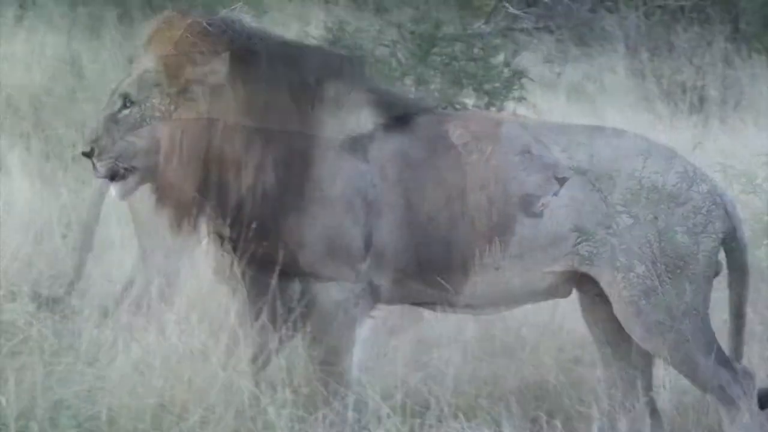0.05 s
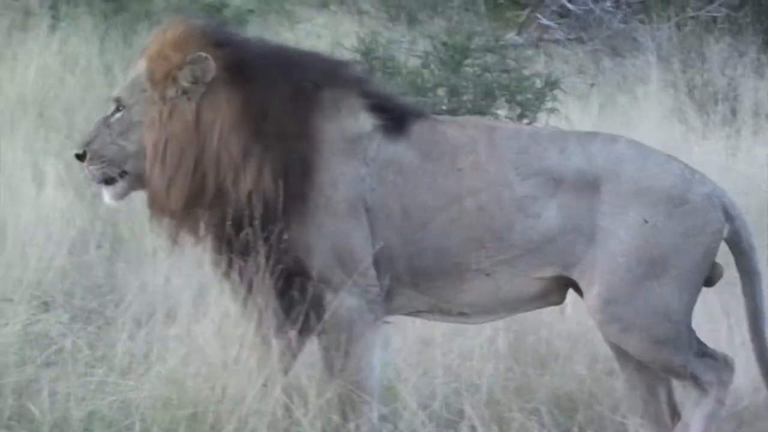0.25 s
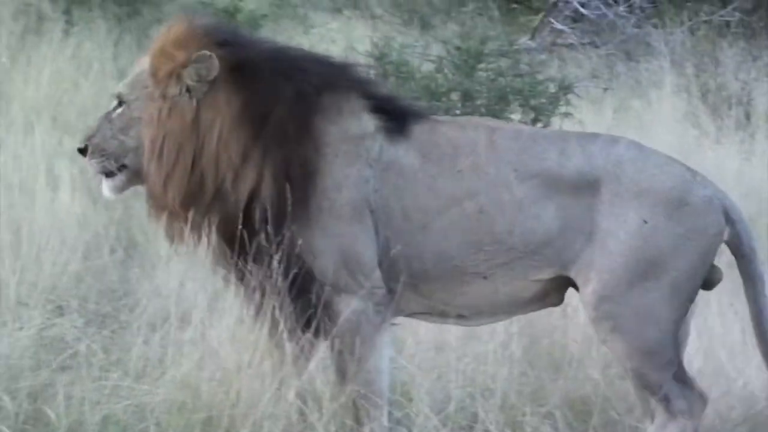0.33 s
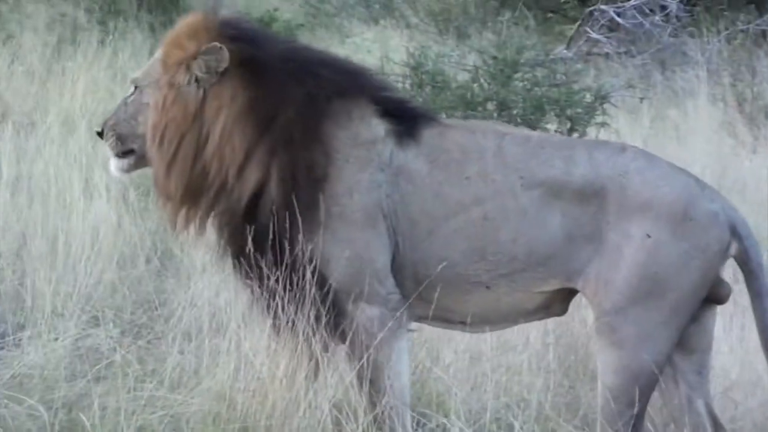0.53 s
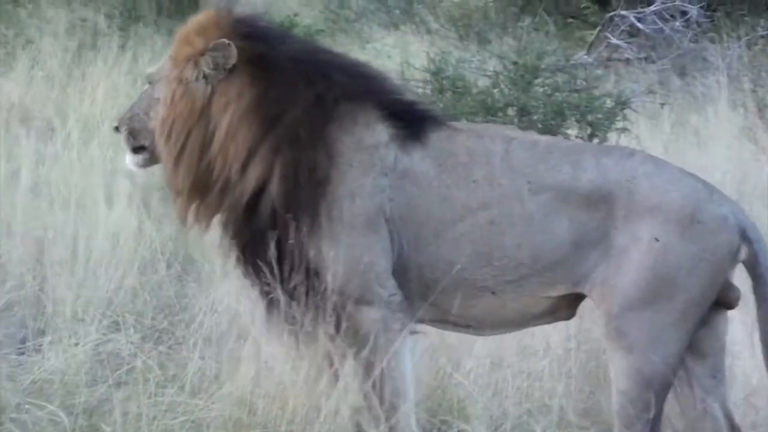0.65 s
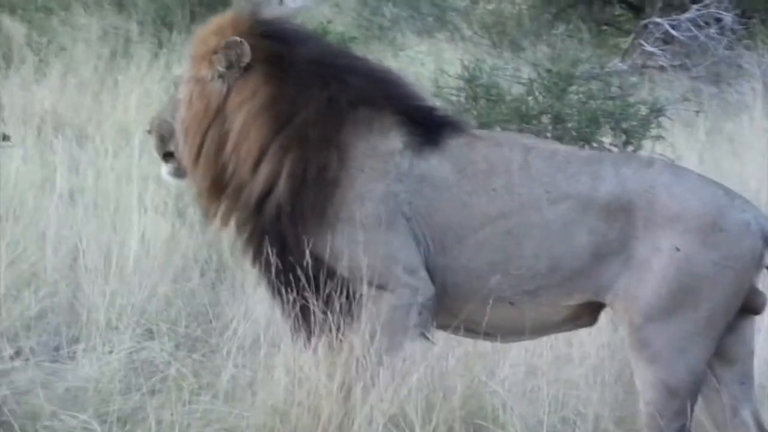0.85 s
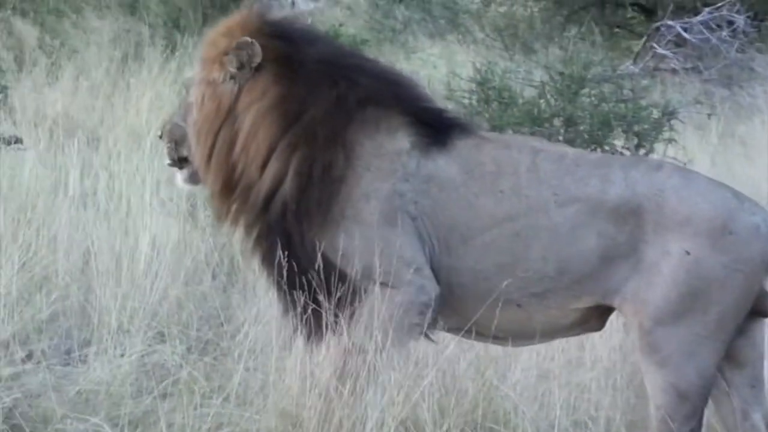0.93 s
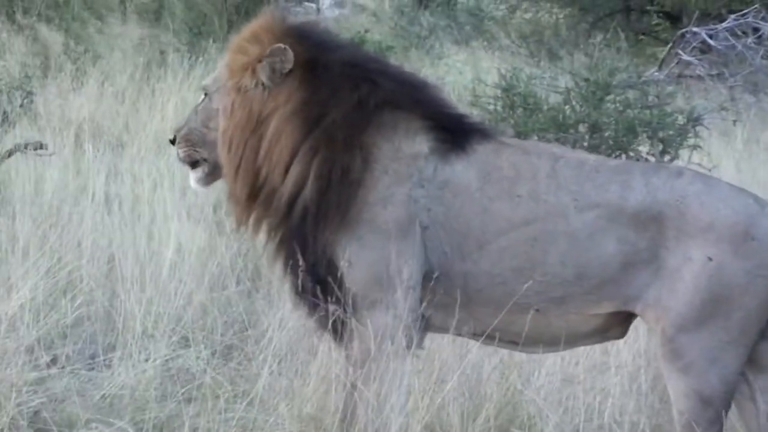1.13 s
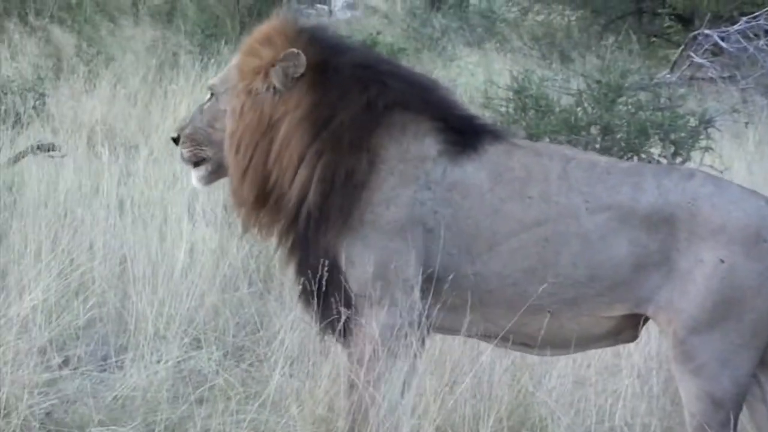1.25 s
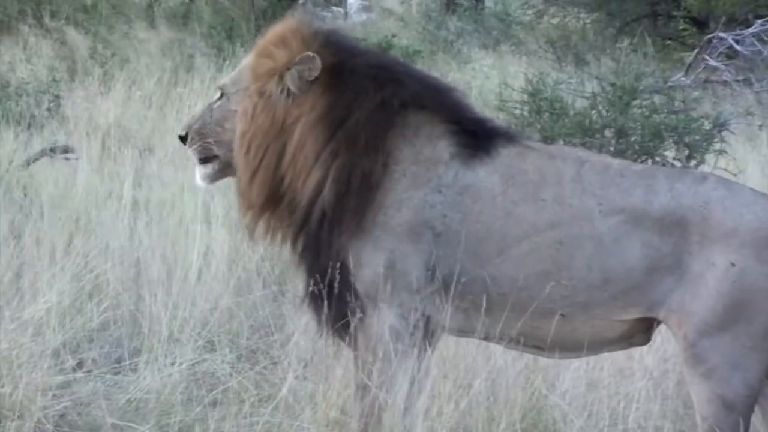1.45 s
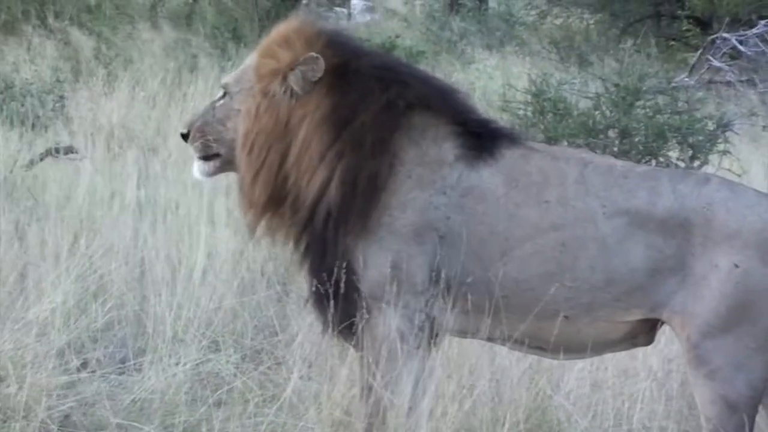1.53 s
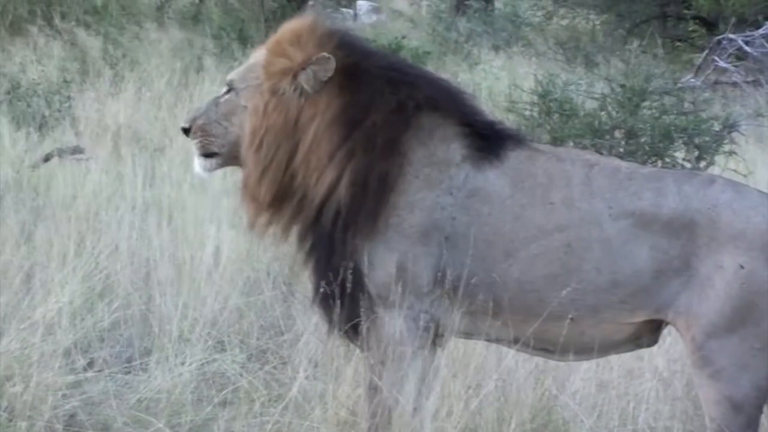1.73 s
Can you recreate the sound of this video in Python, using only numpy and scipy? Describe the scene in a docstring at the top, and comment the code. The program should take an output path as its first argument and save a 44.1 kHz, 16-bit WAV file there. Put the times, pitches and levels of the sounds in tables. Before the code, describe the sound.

A bird sings one clear phrase in open grassland, almost straight ahead. At about 0.2 seconds a high whistle drops and wavers, followed near 0.6 by a softer, lower warble. From 0.8 to 1.5 seconds come five quick rising chirps with a thin echo. A barely audible dull scuff falls under the first chirp. Faint wind rumble and even hiss continue throughout.

```python
"""A high bird whistle drops and wavers, then come a soft low warble and five upslurred chirps, each led
in by a short grace note. One bird sings in open grassland, almost straight ahead of a stereo pair of
microphones. The direct sound arrives first, then a bounce off the ground and a thin echo from bushes
farther off. Underneath lie faint wind rumble, an even hiss and one soft scuff."""
import sys
import numpy as np
from scipy import signal
from scipy.fft import rfft, irfft
from scipy.io import wavfile
from scipy.ndimage import uniform_filter1d

SR = 44100
rng = np.random.default_rng(int(sys.argv[2]) if len(sys.argv) > 2 else 0)


def to_wav(sig):
    """Store sig (one row per channel, or 1-D mono) as 16-bit WAV at the path in sys.argv[1].

    Samples outside -1..1 are clipped; the rate is SR.
    """
    pcm = np.clip(np.atleast_2d(sig), -1, 1) * 32767
    pcm = np.round(pcm).astype(np.int16)
    wavfile.write(sys.argv[1], SR, pcm.T)  # frames by channels


N = 79380

# melody of the opening whistle: t/s, f/Hz
WHISTLE_PITCH = [(0.229, 4940), (0.263, 5174), (0.274, 5053), (0.283, 5260), (0.294, 3580), (0.297, 3453),
                 (.302, 3816), (.308, 3220), (0.334, 3100), (0.349, 3546), (0.356, 2897), (0.363, 3047),
                 (.369, 3340), (0.376, 2937), (0.387, 3168), (0.392, 3396), (0.398, 3220), (0.407, 3450),
                 (.418, 3435), (.455, 3825), (.472, 3727)]
# strength of the opening whistle: t/s, level/dB
WHISTLE_LEVEL = [(0.229, -52), (.238, -37), (0.249, -31.5), (.282, -33.5), (0.297, -33.5), (0.301, -29),
                 (.315, -33), (0.351, -30.5), (0.359, -49), (.37, -27), (0.377, -40), (0.387, -30),
                 (.43, -30), (0.468, -29.5), (0.471, -46)]
# low warble: t/s, f/Hz, level/dB
WARBLE = [(0.578, 2060, -55.5), (0.594, 2327, -42.5), (0.612, 2320, -39), (0.632, 2038, -40.5),
          (0.656, 2294, -40.5), (0.676, 2538, -31), (0.684, 2512, -30), (0.69, 2527, -37.5),
          (0.694, 2234, -41.5), (0.702, 2040, -58.5)]
# chirps: start/s, length/s, level/dB, top f/Hz, time to top/s, end f/Hz, overtone boost/dB,
# then each one's grace note: length/s, f/Hz, rise/s, level/dB
CHIRPS = [ (.821, 0.071, -31, 3606, 0.036, 3200, 1.5, 0.016, 3250, 0.0108, -38.5),
          (0.949, 0.071, -30, 3741, 0.055, 3500, 1.5, 0.018, 3310, 0.01, -42),
          (1.088, 0.074, -29, 3854, 0.048, 3210, 2, 0.019, 3800, .014, -39.5),
          (1.238, 0.069, -30.5, 3737, 0.0452, 3560, 0.5, .020, 3164, 0.0109, -39),
          (1.408, 0.064, -32.5, 3720, 0.045, 3880, 0.5, .019, 2943, .010, -45), ]
# colour that throat and beak give the overtones: f/Hz, gain/dB
THROAT = [(4200, -14.5), (5100, -18), (6400, -28), (7100, -41), (7700, -36.5), (8600, -21.5), (9700, -27),
          (11300, -18), (12800, -13), (14200, -32), (15500, -19)]
# hollow resonances of the scuff: f/Hz, width/Hz, relative level/dB
SCUFF_MODES = [(337, 52, 1), (478, 110, -5), (650, 60, -0.5), (864, 62, 3), (1170, 310, -10)]
# spectrum of still air and wind: f/Hz, relative level/dB
AIR_SPECTRUM = [(15, 11.5), (25, 8.5), (45, 4.5), (80, -11), (140, -17.5), (300, -24), (600, -29.5),
                (1200, -33.5), (3000, -35.5), (5000, -39.5), (9000, -41), (15500, -43)]
# how alike the air is at the two microphones: f/Hz, correlation
AIR_LIKENESS = [(25, -.86), (70, -.78), (160, -.4), (350, -.05), (1200, .3), (4000, .3), (15000, .15)]
# slow drift of hiss and rumble: t/s, gain/dB
AIR_DRIFT = [(0, 2), (0.249, -0.5), (.55, -1), (1.5, 0), (1.8, 2)]

OVERTONE_DB = (-1.5, -8.5, -9.5, -25.5)  # harmonics 2 to 5; throat and brightness add to these
WHISTLE_BRIGHT_DB, WARBLE_BRIGHT_DB = (3.5, 1.5, 4.5, 2), (-4.5, 1.5, -3, 4.5)
CHIRP_BRIGHT_DB, GRACE_BRIGHT_DB = (-4.5, 0, 0, 1), -9.5
JITTER, GRACE_JITTER, FLUTTER_DB = .003, .022, .5  # unsteady pitch (as a share of it) and level
EDGE_S = 0.0019  # attack and release of whistle, warble and grace notes
SCOOP_HZ, SCOOP_S, KNEE = 2405, 0.0089, 0.94  # a chirp scoops up to the KNEE share of its top pitch
CREEP_POWER, DROOP_POWER = 1.54, 3.45
SNAP_DB, SNAP_AT_S, SNAP_S = 3.5, 0.0075, 0.00094  # accent at the top of the scoop
CHIRP_EDGE_DB, CHIRP_ATTACK_S, CHIRP_RELEASE_S = -8, 0.0065, 0.01
GRACE_FROM_HZ, GRACE_SAG_HZ_PER_S, GRACE_SWELL_DB = 1700, 16000, 20.5
BIRD_PAN_DB, LEFT_LEAD_S = .2, 1.1e-5  # a hair left of centre
GROUND_DELAY_S, GROUND_DB = .0042, -18
SCATTER_DB, SCATTER_BUILD_S, SCATTER_T60_S, SCATTER_LIKENESS = -17, 0.006, 0.52, .4
AIR_DB, PATCH_DB, GUST_DB, GUST_HZ = -61, 1.0, 1.0, 150


def bird():
    """The phrase as it leaves the beak: whistle, warble, hook and chirps."""
    song, warble = np.zeros(N), np.array(WARBLE)
    add(song, *slur(np.array(WHISTLE_PITCH), np.array(WHISTLE_LEVEL), WHISTLE_BRIGHT_DB))
    add(song, *slur(warble[:, :2], warble[:, ::2], WARBLE_BRIGHT_DB))
    add(song, *hook())
    for start, length, db, top_hz, top_s, end_hz, bright_db, *grace_note in CHIRPS:
        add(song, *chirp(start, length, db, top_hz, top_s, end_hz, bright_db))
        add(song, *grace(start, *grace_note))
    return song


def slur(pitch, level, bright_db):
    """One long note gliding along a pitch curve and a level curve."""
    t = np.arange(pitch[0, 0], pitch[-1, 0], 1 / SR)
    envelope = amp(np.interp(t, *level.T)) * gate(t, EDGE_S, EDGE_S)
    return t[0], syrinx(np.interp(t, *pitch.T), envelope, bright_db)


def chirp(start, length, db, top_hz, top_s, end_hz, bright_db):
    """A quick scoop, a slow creep upward and a bend to the end pitch; it swells toward the middle."""
    t = np.arange(0, length, 1 / SR)
    creep = top_hz * (1 - (1 - KNEE) * np.clip((top_s - t) / (top_s - SCOOP_S), 0, 1) ** CREEP_POWER)
    droop = (top_hz - end_hz) * np.clip((t - top_s) / (length - top_s), 0, 1) ** DROOP_POWER
    hz = SCOOP_HZ + (creep - SCOOP_HZ) * np.minimum(t / SCOOP_S, 1) - droop
    snap_db = SNAP_DB * np.exp(-((t - SNAP_AT_S) / SNAP_S) ** 2)
    arch_db = CHIRP_EDGE_DB * (2 * t / length - 1) ** 2
    level = amp(db + snap_db + arch_db) * gate(t, CHIRP_ATTACK_S, CHIRP_RELEASE_S)
    jitter = JITTER + GRACE_JITTER * np.exp(-t / SCOOP_S)  # the voice settles after the scoop
    return start, syrinx(hz, level, np.add(CHIRP_BRIGHT_DB, bright_db), jitter)


def grace(end, length, hz, rise_s, db):
    """The short note just before a chirp: it swells as it slides up unsteadily, then sags."""
    t = np.arange(0, length, 1 / SR)
    rise = np.sin(np.pi / 2 * np.minimum(t / rise_s, 1))
    sag = GRACE_SAG_HZ_PER_S * np.maximum(t - rise_s, 0)
    pitch = GRACE_FROM_HZ + (hz - GRACE_FROM_HZ) * rise - sag
    level = amp(db - GRACE_SWELL_DB * (1 - rise ** 2)) * gate(t, EDGE_S, EDGE_S)
    return end - length, syrinx(pitch, level, GRACE_BRIGHT_DB, GRACE_JITTER)


def hook(start_s=.7955, length_s=.0135, from_hz=2830, dip_hz=275, db=-37.5, edge_s=0.0049):
    """A short dipping note that opens the run of chirps."""
    t = np.arange(0, length_s, 1 / SR)
    hz = from_hz - dip_hz * np.sin(np.pi * t / length_s)
    return start_s, syrinx(hz, amp(db) * gate(t, edge_s, edge_s), GRACE_BRIGHT_DB)


def syrinx(hz, level, bright_db, jitter=JITTER):
    """The bird's voice: a nearly pure, slightly unsteady tone, its overtones coloured by the throat."""
    hz = uniform_filter1d(hz, size=90, mode="nearest") * (1 + jitter * wander(len(hz), size=40))
    phase = 2 * np.pi * np.cumsum(hz) / SR
    tone = np.sin(phase)
    for k, db in enumerate(np.add(OVERTONE_DB, bright_db), 2):
        tone += amp(read(THROAT, k * hz) + db) * (k * hz < SR / 2) * np.sin(k * phase)
    flutter = amp(FLUTTER_DB * wander(len(hz), size=150))
    return np.sqrt(2) * level * flutter * tone


def grassland(song):
    """Paths from bird to microphones: direct, off the ground, and scattered by bushes in a thin tail."""
    t = np.arange(SR) / SR
    tail = (1 - np.exp(-t / SCATTER_BUILD_S)) * amp(-60 * t / SCATTER_T60_S)
    shared, apart = rng.standard_normal((2, SR)) * tail
    paths = pair(shared, apart, SCATTER_LIKENESS) * amp(SCATTER_DB) / np.linalg.norm(shared)
    paths[:, 0] += amp([BIRD_PAN_DB, -BIRD_PAN_DB])  # direct sound
    paths[:, round(GROUND_DELAY_S * SR)] += amp(GROUND_DB)
    left, right = signal.fftconvolve(song[None], paths, axes=1)[:, :N]
    lag = np.exp(-2j * np.pi * np.fft.rfftfreq(N, 1 / SR) * LEFT_LEAD_S)
    return np.array([left, irfft(rfft(right) * lag, N)])


def scuff(at_s=.848, spread_s=0.014, level_db=-57.5):
    """A brief, dull, hollow brush of noise, the same in both microphones."""
    hz = np.fft.rfftfreq(N, 1 / SR)
    colour = sum(amp(db) / (1 + (2 * (hz - centre) / width) ** 2) for centre, width, db in SCUFF_MODES)
    noise = irfft(rfft(rng.standard_normal(N)) * colour, N)
    swell = np.exp(-((np.arange(N) / SR - at_s) / spread_s) ** 2 / 2)
    return amp(level_db) * unit(noise) * swell


def air(size=2048, hop=512):
    """Open air around the microphones: even hiss with drifting patches, and wind rumble in soft gusts."""
    frames, hz = N // hop + 5, np.fft.rfftfreq(size, 1 / SR)
    re, im, re_apart, im_apart, patches = rng.standard_normal((5, frames, len(hz))).transpose(0, 2, 1)
    patches = unit(uniform_filter1d(uniform_filter1d(patches, size=20, axis=0), size=6, axis=1))
    spectra = pair(re + 1j * im, re_apart + 1j * im_apart, read(AIR_LIKENESS, hz)[:, None])
    gust_db = GUST_DB * wander(frames, size=8) / (1 + (hz[:, None] / GUST_HZ) ** 2)
    spectra *= amp(read(AIR_SPECTRUM, hz)[:, None] + PATCH_DB * patches + gust_db)
    noise = signal.istft(spectra, nperseg=size, noverlap=size - hop)[1][:, :N]
    hiss = signal.sosfilt(signal.butter(4, 200, "high", fs=SR, output="sos"), noise)
    drift_db = np.interp(np.arange(N) / SR, *np.transpose(AIR_DRIFT))
    return amp(AIR_DB + drift_db) * noise / hiss.std()  # the part above 200 Hz sets the level


def pair(left, apart, likeness):
    """Two independent noises blended into left and right with a given correlation."""
    return np.array([left, likeness * left + np.sqrt(1 - likeness ** 2) * apart])


def amp(db):
    """Decibels to gain."""
    return 10 ** (np.asarray(db) / 20)


def unit(x):
    """Scales to rms 1."""
    return x / np.sqrt(np.mean(x ** 2) + 1e-20)


def read(points, hz):
    """Reads a table on a log-frequency axis."""
    f, value = np.transpose(points)
    return np.interp(np.log(hz + 1), np.log(f + 1), value)


def add(mix, start_s, sound):
    """Mixes a sound in at a time."""
    part = mix[round(start_s * SR):][:len(sound)]
    part += sound[:len(part)]


def wander(count, size):
    """Smooth random motion of rms 1."""
    return unit(uniform_filter1d(uniform_filter1d(rng.standard_normal(count), size), size))


def gate(t, attack, release):
    """Soft opening and closing of a note."""
    opening = np.sin(np.pi / 2 * np.clip((t - t[0]) / attack, 0, 1))
    closing = np.sin(np.pi / 2 * np.clip((t[-1] - t) / release, 0, 1))
    return opening * closing


def scene():
    """What reaches the microphones: the bird in the open, over the air and the scuff."""
    return grassland(bird()) + air() + scuff()


def record(dry, cutoff_hz=16050):
    """The recorder's band limit."""
    lowpass = signal.firwin(511, cutoff_hz, window=("kaiser", 9), fs=SR)
    return signal.oaconvolve(dry, lowpass[None], "same")


dry = scene()
out = record(dry)
to_wav(out)
```